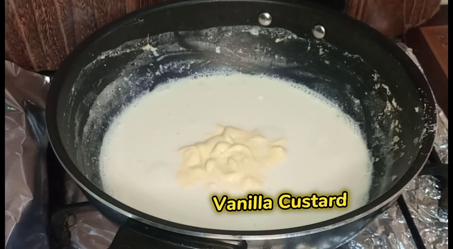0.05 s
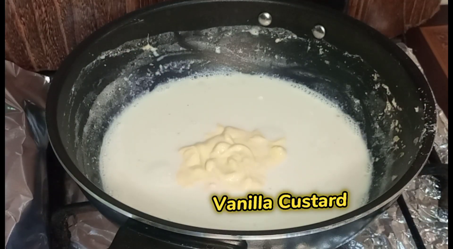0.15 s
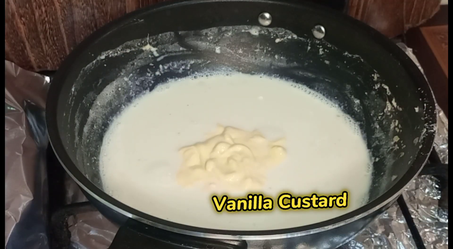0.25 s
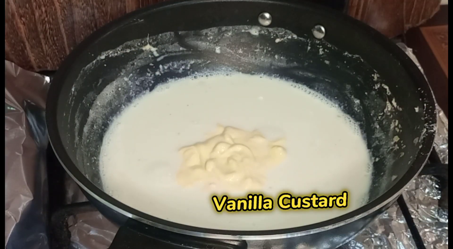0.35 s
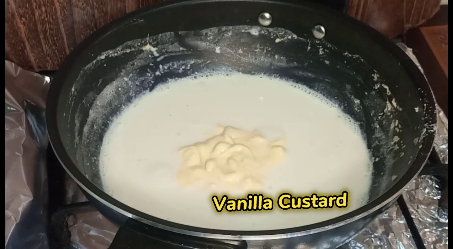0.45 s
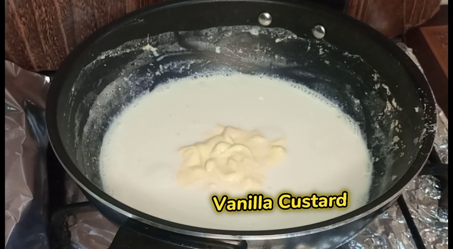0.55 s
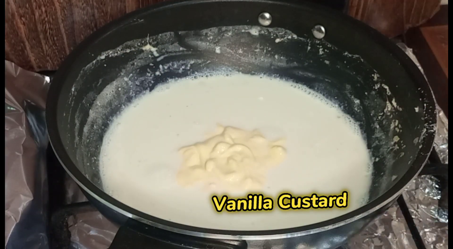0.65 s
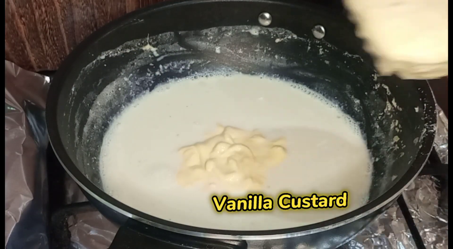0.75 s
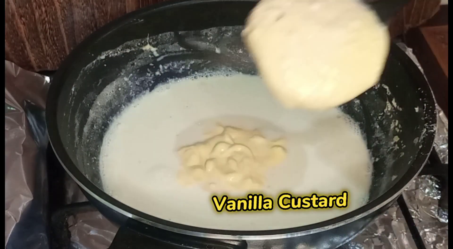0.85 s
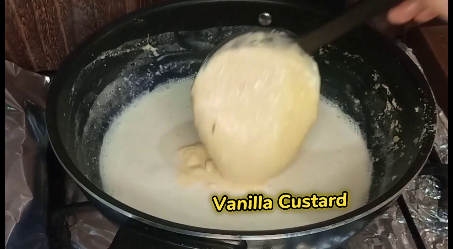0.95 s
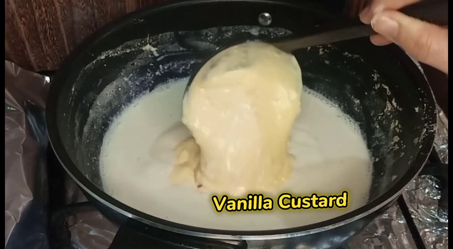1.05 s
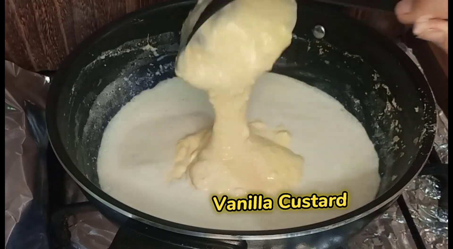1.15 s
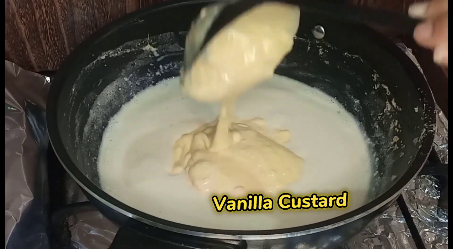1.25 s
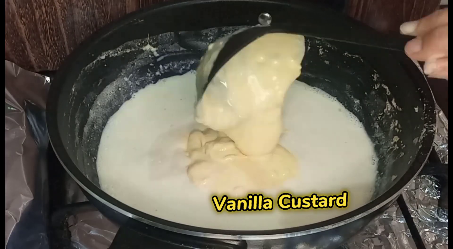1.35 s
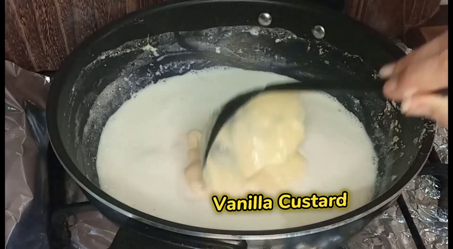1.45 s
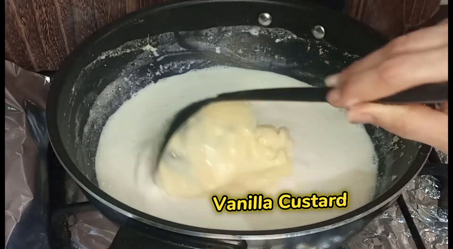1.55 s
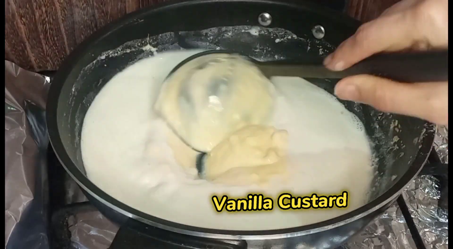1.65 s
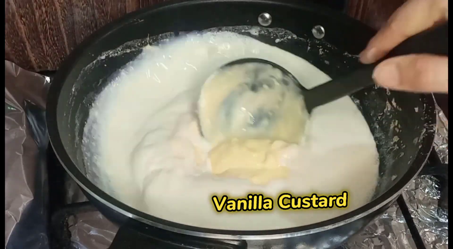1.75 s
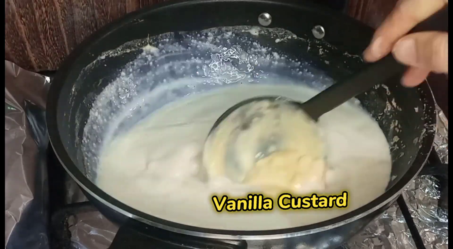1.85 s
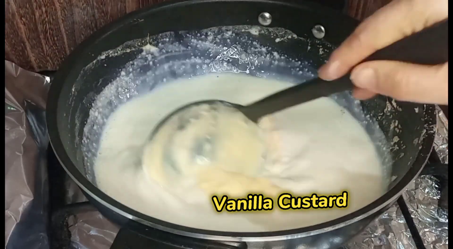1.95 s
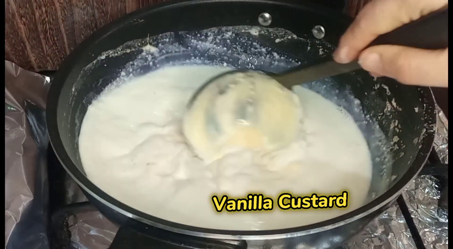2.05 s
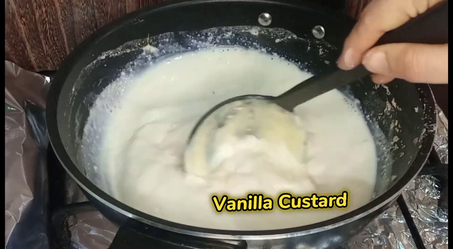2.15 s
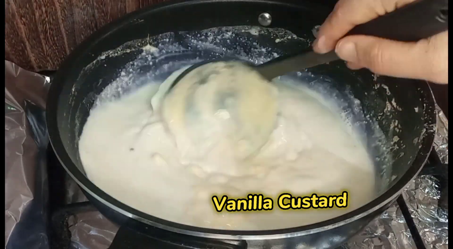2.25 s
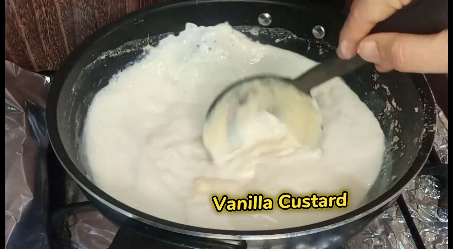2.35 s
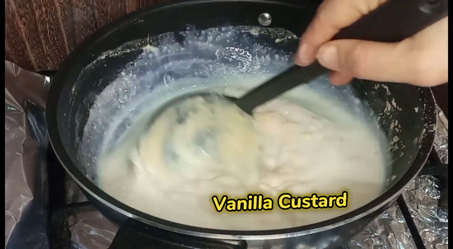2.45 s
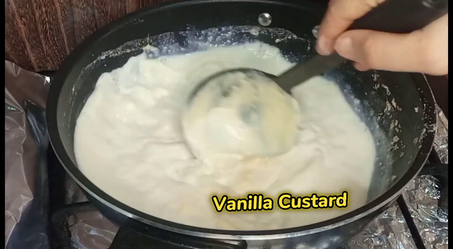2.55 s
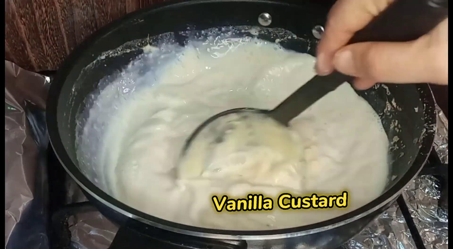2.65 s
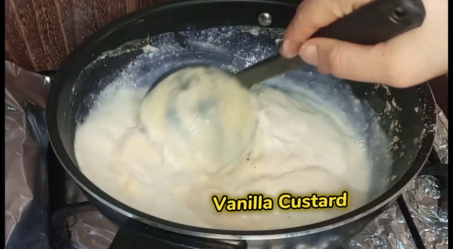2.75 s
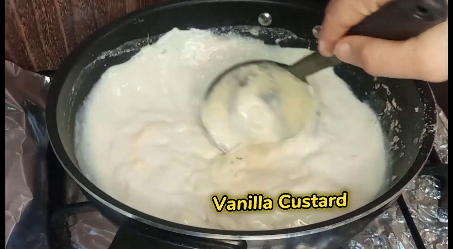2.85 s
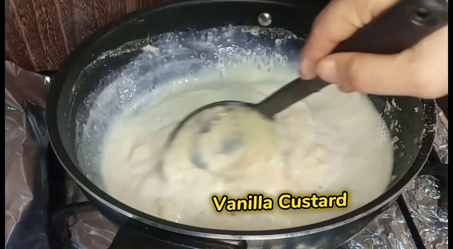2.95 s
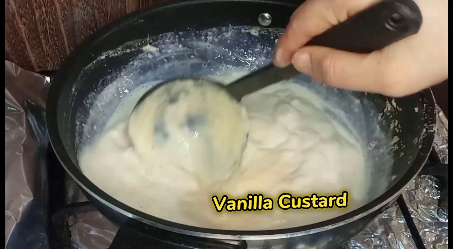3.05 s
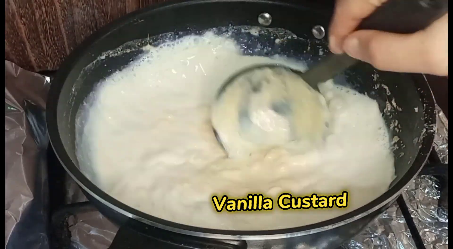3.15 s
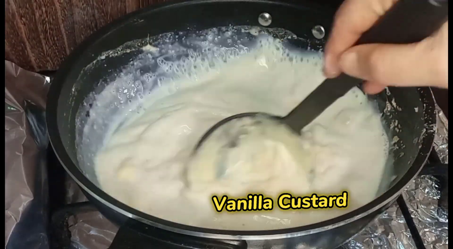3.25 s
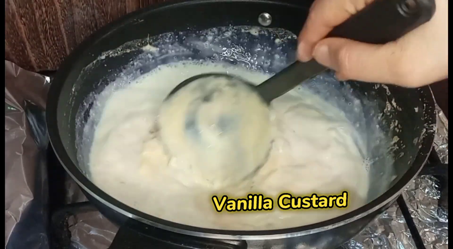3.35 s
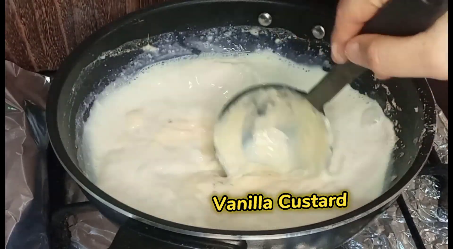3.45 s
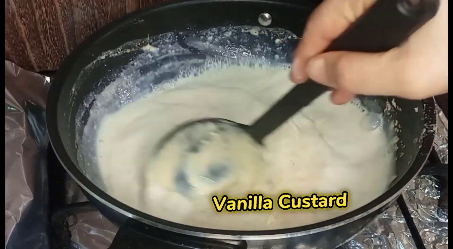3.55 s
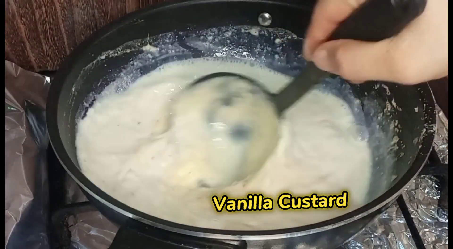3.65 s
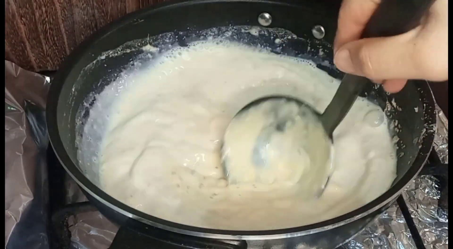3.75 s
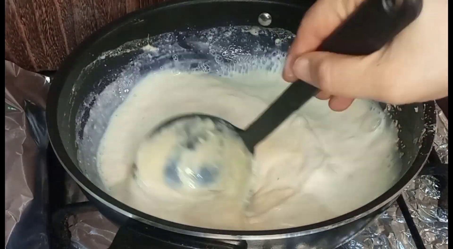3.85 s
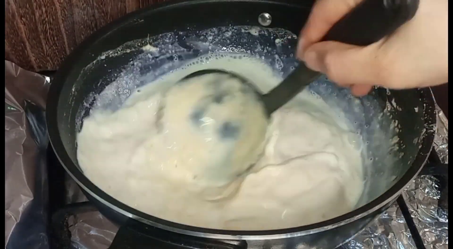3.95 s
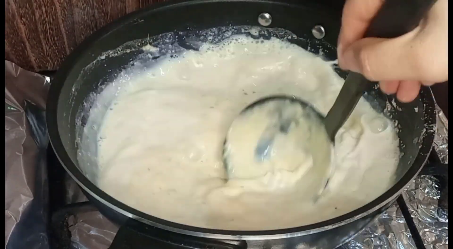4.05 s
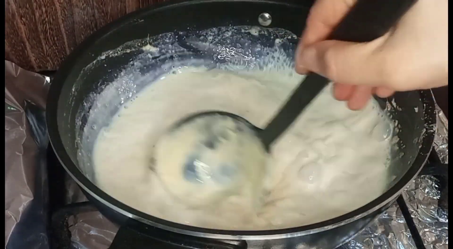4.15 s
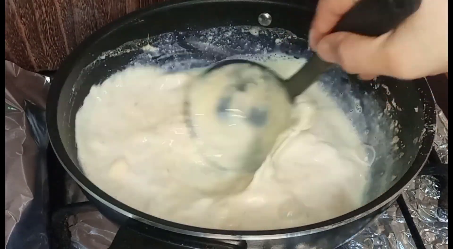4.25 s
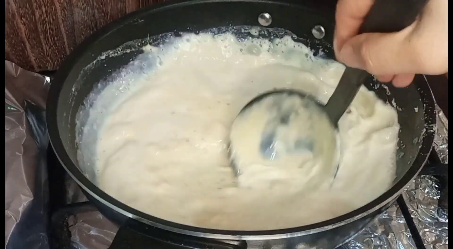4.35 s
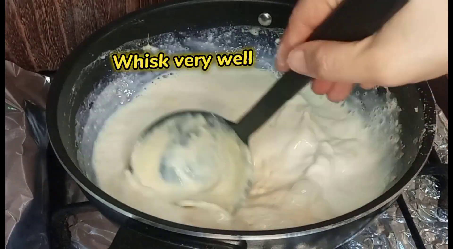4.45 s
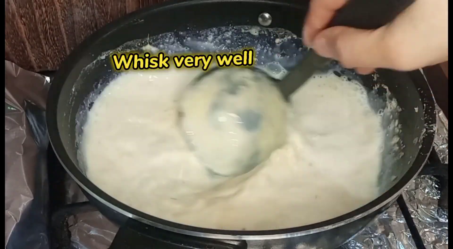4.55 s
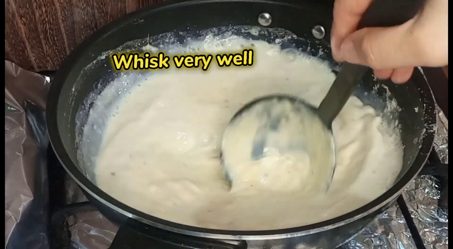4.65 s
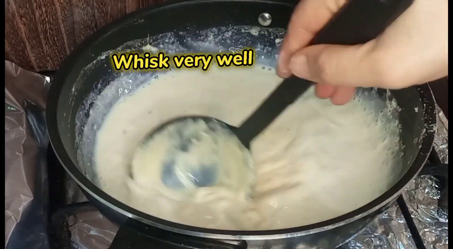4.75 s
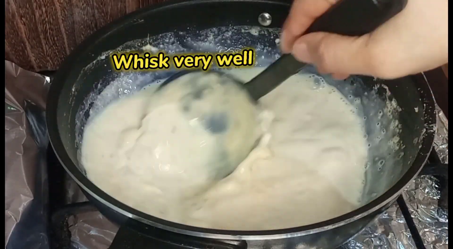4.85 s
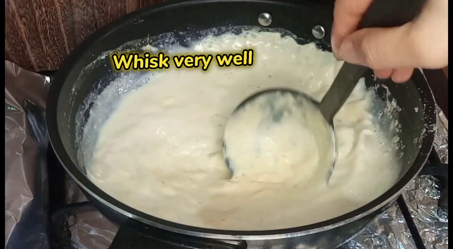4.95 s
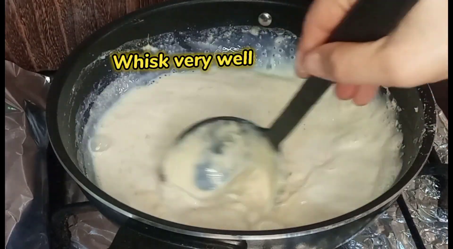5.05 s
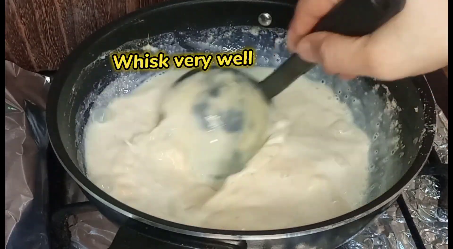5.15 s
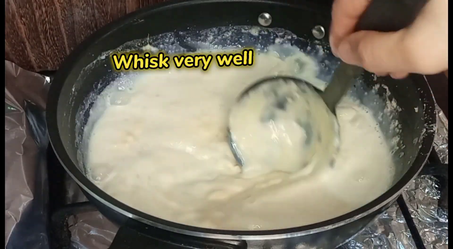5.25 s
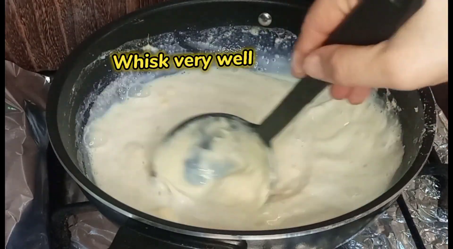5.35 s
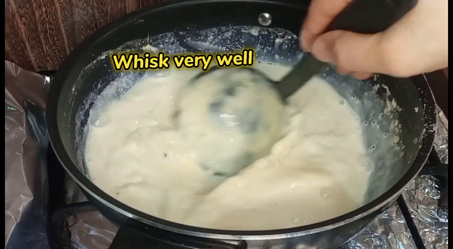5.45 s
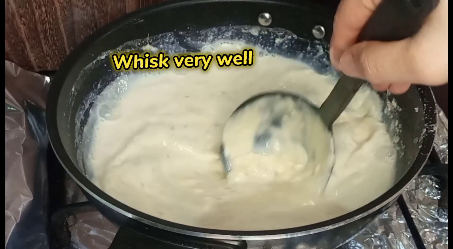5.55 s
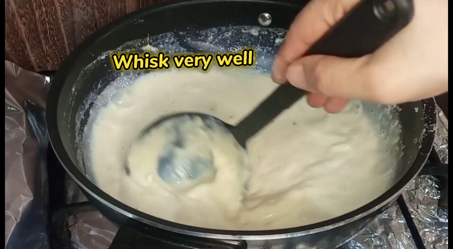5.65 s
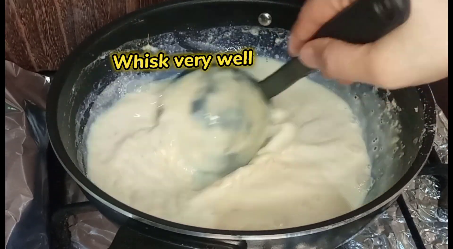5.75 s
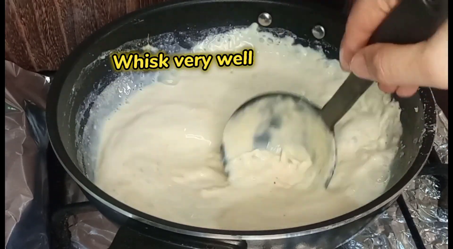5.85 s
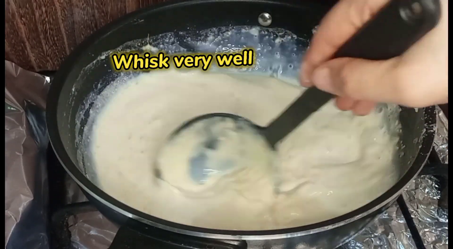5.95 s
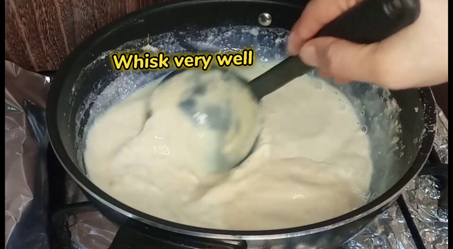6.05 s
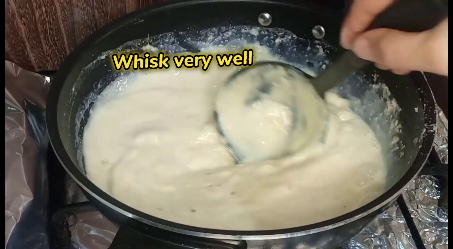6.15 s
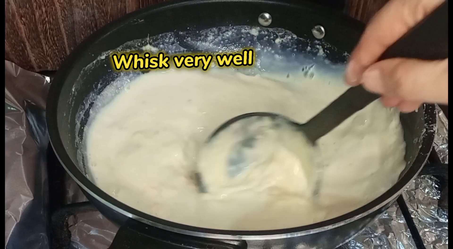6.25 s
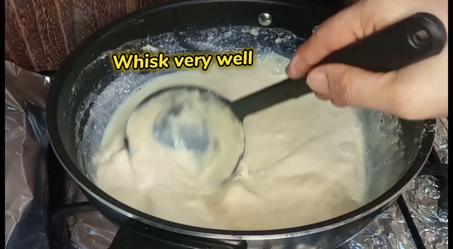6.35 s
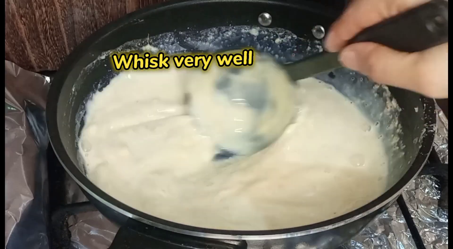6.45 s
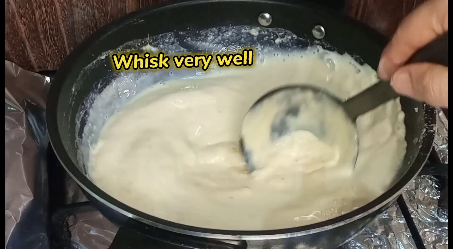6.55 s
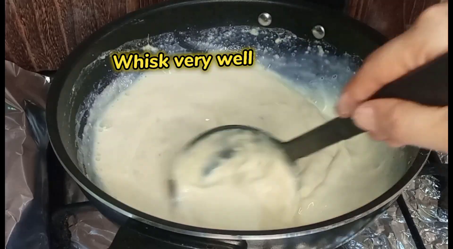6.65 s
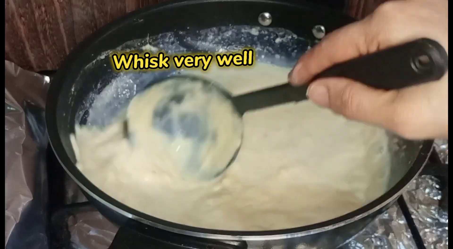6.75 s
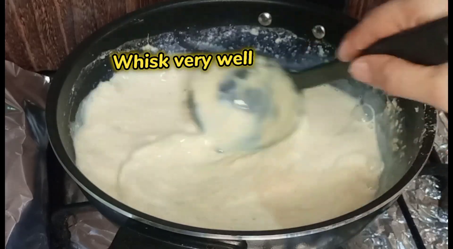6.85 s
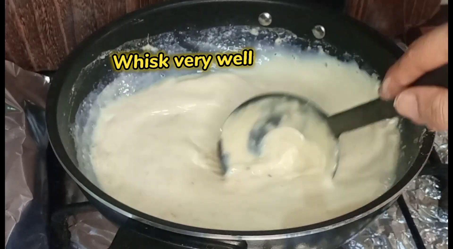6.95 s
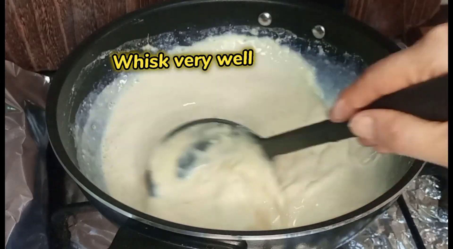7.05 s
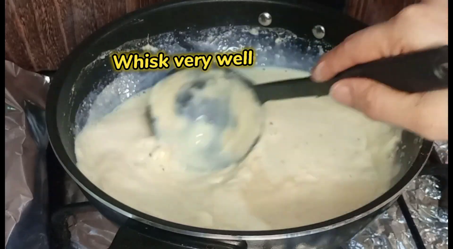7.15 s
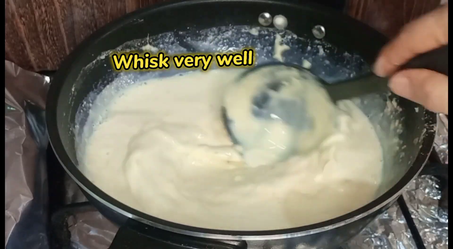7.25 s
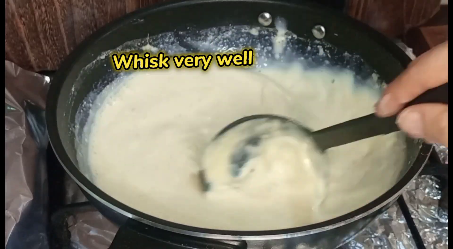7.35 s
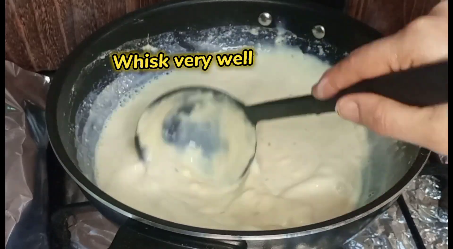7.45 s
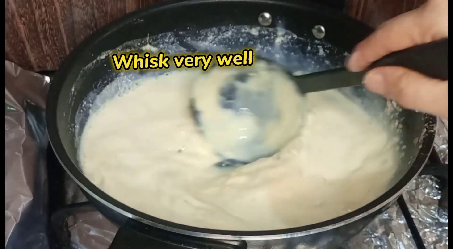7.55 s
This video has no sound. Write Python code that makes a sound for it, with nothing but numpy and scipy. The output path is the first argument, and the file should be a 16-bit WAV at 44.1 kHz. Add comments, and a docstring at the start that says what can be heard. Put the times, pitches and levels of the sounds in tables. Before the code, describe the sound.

A ladle briskly stirs thick custard in a nonstick pan, scraping grittily with dull knocks, sharp ticks and small wet squeaks, in a quiet kitchen.

```python
"""First comes quiet kitchen air with a low murmur; after about a second a ladle starts to stir thick custard
in a coated pan on a gas stove, close to a phone. Each stroke drags the bowl over the pan floor: gritty rubbing
makes the hiss and sets the pan ringing, and now and then one mode sings out. Shoves rock the pan on its trivet
with a low rumble. Knocks are short pushes that ring pan and stove; ticks are tiny rings with a crack. Squeaks
and a swish come from the custard. Behind it all lie the air, the murmur and a faint steady whine."""
import sys
import numpy as np
from scipy import signal
from scipy.fft import rfft, irfft
from scipy.io import wavfile
from scipy.ndimage import uniform_filter1d

SR = 44100
rng = np.random.default_rng(int(sys.argv[2]) if len(sys.argv) > 2 else 0)


def file_out(sig):
    """Save sig as 16-bit WAV at sys.argv[1]."""
    # one column per channel
    cols = np.atleast_2d(sig).T
    # limit, then scale
    lim = np.clip(cols, -1, 1)
    pcm = np.round(lim * 32767).astype(np.int16)
    wavfile.write(sys.argv[1], SR, pcm)


N = 334719  # length in samples

# All table levels are before the small trims made where they are played.
# Strokes of the ladle: peak t/s, rise t/s, fall t/s, then level/dB of hiss, rim ring, wall ring, floor ring
STROKES = [(1.095, 0.072, 0.12, -74, -78, -64.5, -74), (1.628, 0.032, 0.19, -62, -63, -48, -52.5),
           (1.699, 0.096, 0.19, -59, -68.5, -88.5, -60), (2.004, 0.059, 0.44, -51, -54.5, -54.5, -52),
           (2.072, 0.028, 0.078, -50, -41.5, -38, -35), (2.145, 0.027, 0.11, -49, -48, -38, -46),
           (2.314, 0.015, 0.027, -82.5, -52.5, -52, -49.5), (2.411, 0.08, 0.12, -46.5, -46.5, -37.5, -45.5),
           (2.56, 0.31, 0.97, -51.5, -55, -54.5, -57), (2.644, 0.02, 0.15, -47.5, -48, -42.5, -45),
           (2.829, 0.11, 0.25, -47, -50.5, -54, -52.5), (2.928, 0.02, 0.2, -47.5, -51, -43.5, -43.5),
           (3.103, 0.067, 0.18, -48.5, -49, -51, -46.5), (3.241, 0.04, 0.15, -45, -45.5, -38, -42),
           (3.389, 0.065, 0.12, -46, -45, -50, -44), (3.512, 0.077, 0.31, -51, -55, -49, -46.5),
           (3.666, 0.049, 0.13, -54, -50.5, -57, -75.0), (3.815, 0.35, 0.46, -63, -49.5, -74, -54.5),
           (3.883, 0.16, 0.29, -50.5, -52, -51, -54.5), (4.114, 0.12, 0.25, -45, -44, -50.5, -45.5),
           (4.211, 0.078, 0.15, -51.5, -51, -48.5, -48.5), (4.373, 0.11, 0.39, -45, -44.5, -45, -47),
           (4.584, 0.0044, 0.051, -56.5, -53, -47, -61), (4.712, 0.08, 0.37, -49, -47.5, -47.5, -40.5),
           (4.911, 0.028, 0.065, -44.5, -45.5, -44.5, -63), (4.999, 0.017, 0.15, -44.5, -35.5, -30.5, -46),
           (5.132, 0.22, 0.2, -46, -42.5, -47, -45), (5.242, 0.067, 0.11, -49.5, -94, -53.5, -44),
           (5.313, 0.024, 0.27, -44, -46, -46, -51), (5.46, 0.21, 0.26, -49, -45.5, -73, -49.5),
           (5.596, 0.019, 0.47, -45.5, -42.5, -44.5, -48.5), (5.8, 0.034, 0.11, -44, -44.5, -43, -50),
           (5.906, 0.036, 0.13, -42, -43.5, -46.5, -47.5), (6.013, 0.078, 0.16, -48.5, -45.5, -49, -57),
           (6.149, 0.012, 0.4, -52.5, -59, -75, -89.5), (6.27, 0.13, 0.17, -50.5, -49.5, -47, -47),
           (6.357, 0.078, 0.1, -46, -45.5, -51, -59), (6.444, 0.03, 0.33, -45.5, -44.5, -55.5, -49),
           (6.67, 0.15, 0.13, -46.5, -44.5, -44, -47), (6.808, 0.082, 0.24, -44, -44.5, -50.5, -45),
           (7.014, 0.083, 0.28, -43, -45.5, -47.5, -48), (7.192, 0.091, 0.18, -42.5, -43.5, -46, -43),
           (7.363, 0.12, 0.18, -46.5, -45, -46.5, -45), (7.546, 0.14, 0.15, -45, -47.5, -50.5, -48.5)]
STROKE_CURVE = (1.95, 1.67)  # roundness of rise and fall: 1 = straight in dB, 2 = bell
# Per part: (lag behind the listed peak t/s, share of the listed fall time)
HISS_TIMING, RIM_TIMING, WALL_TIMING, FLOOR_TIMING = (0.0028, 0.83), (0.0054, 0.81), (0.0034, 0.63), (0.0095, 0.68)
# Ringing tones (modes) of the pan's floor, wall and rim, and of the ladle: f/Hz, level/dB
FLOOR_MODES = [(393, -6.5), (533, 3.5), (575, 4), (610, -7.5), (660, 1), (720, -1.5), (838, -12)]
WALL_MODES = [(960, 2.2), (1020, 6.3), (1065, 8.8), (1135, 8.1), (1230, 5.6), (1320, 1.1), (1405, 4.3)]
RIM_MODES = [(1600, 1), (1680, 5.5), (1810, 4.5), (1890, -1), (2010, -2.5), (2180, 2), (2280, 3),
             (2450, -3.5)]
LADLE_MODES = [(3330, -9.5), (4170, -2.5), (4650, -6.5), (5800, -5), (6400, -11), (8600, -13)]
# Tone colour of the rubbing hiss and of the wet crackle: f/Hz, level/dB
HISS = [(1410, -25), (2400, -10), (2490, -10), (2850, -6), (3430, -5), (4310, -4.5), (5060, -9),
        (5820, -6.5), (6570, -6.5), (9030, -14), (11000, -25), (14300, -80)]
WET = [(5000, -81), (8500, -1.5), (12100, -14), (13500, -28), (14900, -2.5), (15500, -13), (16000, -6)]
# Crackle level/dB at the hiss level/dB of a firm stroke, and dB gained per dB of hiss
CRACKLE_DB, FIRM_DB, CRACKLE_SLOPE = -64.5, -49, 0.86


def scraping(hiss_db):
    """The ladle bowl drags over the coating: hiss, wet crackle, ladle tones and the pan's modes."""
    rim_db = swells(STROKES, 4, RIM_TIMING, STROKE_CURVE)
    wall_db = swells(STROKES, 5, WALL_TIMING, STROKE_CURVE)
    floor_db = swells(STROKES, 6, FLOOR_TIMING, STROKE_CURVE)
    slip_db = 1.2 * walk(22) + 2.2 * walk(150)  # the grip slips and catches

    hiss, force = 0, grit(0.57) + 0.13 * pops(97, 2.5)
    for hz in 2400 * 2 ** np.arange(0, 2.3, .15):  # each patch of the hiss swishes on its own
        patch = [(hz / 1.11, -40), (hz / 1.05, 0), (hz * 1.05, 0), (hz * 1.11, -40)]
        patch_db = 3.16 * walk(12) - 4.3 * np.abs(walk(40))
        hiss = hiss + undb(patch_db) * colour(force, patch)
    hiss = colour(hiss, HISS)
    running_level = np.sqrt(uniform_filter1d(hiss ** 2, size=4000))
    hiss *= undb(hiss_db + slip_db - 0.83) / running_level  # evened out, then given the strokes' level

    crackle_db = CRACKLE_DB + CRACKLE_SLOPE * (hiss_db - FIRM_DB)  # harder strokes squeeze out more bubbles
    crackle_db = crackle_db + slip_db + 2.1 * walk(4.27) + 0.84 * walk(38)
    wet = unit(colour(grit(4.3) + 0.33 * pops(50, 7.7), WET)) * undb(crackle_db)

    # many weak modes fill the valleys between the strong ones
    body = unit(colour(grit(4.3), [(700, -34), (1100, -4.5), (2000, 12.0), (2800, 0.5)]))
    body *= undb(rim_db + slip_db - 6.0)

    pan = rubbed(FLOOR_MODES, 0.073, floor_db + slip_db / 2 - 2.5 + 0.77 * walk(14), 6.2, 13, 0.018)
    pan += rubbed(WALL_MODES, 0.032, wall_db + slip_db / 2 - .6, 3.0, 18, 0.012)
    pan += rubbed(RIM_MODES, 0.024, rim_db + slip_db / 2 - 0.7, 5.9, 18, 0.025)
    ladle = rubbed(LADLE_MODES, 0.01, hiss_db - 9, 6.0, 20, 0.03)
    return hiss + squeaks(hiss_db) + wet + ladle + pan + body


def squeaks(hiss_db, rate=130, length_s=0.035, level_db=0.1):
    """Air squeezed out of the custard: brief gliding whistles, rate per second, that follow the hiss level."""
    out = np.zeros(N + 4096)  # spare room for the last whistle
    for s, pitch, glide, size in rng.random((int(rate * N / SR), 4)):
        n, i = int(length_s * SR * (0.35 + 1.85 * size ** 2)), int(s * N)
        hz = 1300 * 7.5 ** pitch * (1 + 0.062 * (glide - .4) * np.linspace(0, 1, n))
        whistle = np.hanning(n) * np.sin(2 * np.pi * np.cumsum(hz) / SR)
        out[i:i + n] += undb(level_db - 9.0 * glide - 5.0 * pitch) * whistle
    return out[:N] * undb(hiss_db)


# Ring accents, moments when one mode of the rubbed pan sings out: peak t/s, length t/s, level/dB, f/Hz
RING_ACCENTS = [(4.24, 0.064, -48.5, 538), (5.966, 0.052, -45, 2290), (6.35, 0.048, -41.5, 2220),
                (7.148, 0.04, -44, 667), (7.334, 0.019, -42, 1310), (7.365, 0.02, -48, 2260),
                (7.515, 0.015, -45, 2210)]


def ring_accents(width=0.044):
    """Each accent is a brief swell of rough noise in one narrow mode of the rubbed pan."""
    t, out = np.arange(N) / SR, 0
    for s, length_s, db, hz in RING_ACCENTS:
        peak = [(hz / (1 + 2 * width), -25), (hz, 0), (hz * (1 + 2 * width), -25)]
        band = unit(colour(grit(1.2), peak))
        out = out + band * undb(db - 10 * ((t - s) / length_s) ** 2)
    return out


# Shoves that rock the pan on the trivet: peak t/s, rise t/s, fall t/s,
# low rumble level/dB, upper stove modes level/dB
SHOVES = [(1.401, 0.049, 0.032, -88, -67), (1.637, 0.068, 0.27, -52.5, -84),
          (2.084, 0.015, 0.14, -36, -38.5), (2.15, 0.073, 0.078, -45, -46), (2.312, 0.3, 0.17, -53.5, -68),
          (2.672, 0.15, 0.042, -60.5, -87), (3.919, 0.27, 0.11, -59.5, -92), (4.11, 0.13, 0.081, -61, -62),
          (4.34, 0.23, 0.47, -67, -62), (4.753, 0.058, 0.29, -38.5, -37.5),
          (4.938, 0.197, 0.89, -47.5, -80), (5.16, 0.026, 0.24, -90.0, -46), (6.6, 0.18, 0.56, -66, -88),
          (6.81, 0.041, 0.1, -68, -59.5), (7.179, 0.08, 0.15, -38, -35), (7.378, 0.17, 0.27, -42.5, -56)]
SHOVE_CURVE = (3.1, 1.31)  # roundness of rise and fall, as for the strokes
LOW_TIMING, HIGH_TIMING = (0.00089, 1.06), (-0.00059, 0.92)  # (lag t/s, share of the fall time)
TREMBLE_LOW_DB, TREMBLE_HIGH_DB = -25, -27  # the stove trembles under any stroke, relative to its hiss
# Low and upper ringing tones of the stove top: f/Hz, level/dB
STOVE_LOW = [(55, -3.5), (74, -6), (101, 6), (136, 7), (165, -2.5), (190, -7.5)]
STOVE_HIGH = [(213, -4), (244, -1), (296, -7.5), (338, -9), (402, -2.5), (455, -9.5)]


def rocking(hiss_db):
    """The shoved pan judders on the trivet: stove-top modes over a dense rattle."""
    low_db = swells(SHOVES, 3, LOW_TIMING, SHOVE_CURVE)
    high_db = swells(SHOVES, 4, HIGH_TIMING, SHOVE_CURVE)
    judder_db = 1.8 * walk(45)
    # add the energies of shove and tremble
    low_db = 20 * np.log10(np.hypot(undb(low_db), undb(hiss_db + TREMBLE_LOW_DB))) + judder_db
    high_db = 20 * np.log10(np.hypot(undb(high_db), undb(hiss_db + TREMBLE_HIGH_DB))) + judder_db
    rattle = unit(colour(grit(1.9), [(150, -29.0), (250, 7.5), (450, 0.5), (900, -2), (1500, -34)]))
    stove = rubbed(STOVE_LOW, 0.065, low_db - 0.7, 2.6, 14, 0.018)
    stove += rubbed(STOVE_HIGH, 0.07, high_db + 0.3, 3.3, 12, 0.012)
    return stove + rattle * undb(high_db - 2.3)


# Dull knocks of ladle on pan: t/s, peak level/dB, share of the low modes level/dB
KNOCKS = [(1.628, -32.5, -17), (2.072, -7.5, 1), (2.081, -12, 4), (2.098, -17, -8), (2.119, -18, 0),
          (2.319, -35, -3), (2.624, -18.5, -34), (2.944, -23, -28), (3.223, -31, -23), (3.85, -30.5, 1),
          (4.733, -19, 23), (4.756, -16, 12), (5.01, -13, -34), (5.026, -18.5, -31), (5.046, -19, -21),
          (7.178, -29, 3), (7.326, -25, -14)]


def knocks():
    """Each blow is a short push into all the modes; random shares stand for its place on the pan."""
    low, high = FLOOR_MODES + STOVE_HIGH + STOVE_LOW, WALL_MODES + RIM_MODES
    out, shares = np.zeros(N), rng.standard_normal((len(KNOCKS), len(low + high)))
    push = np.zeros(SR // 4)
    push[:34] = np.hanning(34)  # under a millisecond of contact force
    rings = []
    for hz, db in low + high:
        t60 = 0.027 * (1000 / hz) ** 0.12  # the ladle stays in contact and damps the ring, high modes sooner
        kick = np.gradient(push) * SR / (2 * np.pi * hz)
        rings.append(undb(db) * mode(kick, hz, t60))
    rings = np.array(rings)
    is_low = np.arange(len(rings)) < len(low)
    for (s, db, low_db), share in zip(KNOCKS, shares):
        weights = np.sign(share) * undb(2.3 * np.abs(share)) * np.where(is_low, undb(low_db), 1)
        ring = weights @ rings
        i = int(s * SR)
        out[i:i + len(ring)] += (undb(db - 8) * ring / np.max(np.abs(ring)))[:N - i]
    return out


# Sharp ticks and wet pops: t/s, level/dB, f/Hz, broad crack against the ring level/dB
TICKS = [(1.0277, -35.5, 7100, 18), (1.383, -56.5, 1990, 23.5), (1.961, -40, 2190, 10.5),
         (2.146, -29, 4400, -6), (2.3484, -34, 5810, -1), (2.3635, -29.5, 6540, -1),
         (2.597, -25.5, 6800, 4), (2.629, -21, 4370, 14), (2.638, -24, 3280, -4), (2.752, -23.5, 4100, -7),
         (2.779, -38, 7450, 20), (2.881, -20.5, 4130, 6), (2.884, -16, 4600, 5), (2.8853, -21, 2130, 4),
         (3.3707, -27, 6300, 0), (3.6537, -17, 3680, -6), (3.7779, -33, 2300, 13),
         (3.7986, -35, 5200, 11.5), (3.849, -30, 2070, -3), (4.0425, -46, 5000, 12), (4.0973, -13, 2510, 7),
         (4.359, -22.5, 3410, 13.5), (4.3696, -18, 2880, 7), (4.373, -16.5, 1860, 8.5),
         (4.5932, -31, 2290, -14), (4.6796, -38.5, 5000, 18), (4.8991, -30, 5950, 5),
         (4.995, -9.5, 2170, -2), (5.05, -27.5, 2320, 13.5), (5.133, -9.5, 2450, -22),
         (5.1417, -18.5, 2770, -5), (5.2164, -25, 6200, -2), (5.2594, -40, 4620, 17),
         (5.344, -21.5, 8630, 5), (5.315, -23.5, 5440, 8), (5.596, -16.5, 1850, 4),
         (5.659, -24, 2050, 10.5), (5.8002, -27, 3430, -1), (5.9003, -23, 2260, 14.5),
         (6.1424, -25.5, 3300, -10), (6.4528, -23.5, 3380, -5), (6.56, -30, 2300, 12),
         (7.37, -28.5, 2280, 9)]
# Tone colour of the crack: f/Hz, level/dB
CRACK = [(1000, -5), (2500, 1), (5000, 0.5), (9000, 5.5), (13300, -6.5), (15000, 6), (16000, 7)]


def ticks():
    """A short ring that rises from the tick's pitch, with a broad crack and a gritty tail."""
    out, t = np.zeros(N), np.arange(SR // 10) / SR
    noise = rng.standard_normal((len(TICKS), len(t)))
    for (s, db, hz, crack_db), hiss in zip(TICKS, noise):
        ring = np.sin(2 * np.pi * hz * t * (1 + 0.86 * t))
        ring *= (1 - np.exp(-t / 0.00029)) * undb(-60 * t / 0.021)
        grains = np.abs(np.repeat(hiss[::40], 40)[:len(t)]) ** 0.64  # uneven steps roughen the tail
        fade = np.exp(-t / 0.00062) + 0.14 * np.exp(-t / 0.023) * grains
        crack = unit(colour(hiss, CRACK)) * (1 - np.exp(-t / 0.00024)) * 1.73 * fade
        i = int(s * SR)
        out[i:i + len(t)] += (undb(db - 8.5) * (ring + undb(crack_db - 12.0) * crack))[:N - i]
    return out


# A thin swish as custard slides off the ladle: t/s, level/dB, f/Hz
SWISH = [(1.68, -76, 4180), (1.78, -65, 4630), (1.9, -71, 4900), (1.96, -65, 5060), (2.0, -120, 5150)]


def swish():
    """A narrow band of sliding noise that rises in pitch."""
    db, hz = curves(SWISH)
    band = unit(colour(grit(1.4), [(1, -4), (150, 7), (450, -13)]))
    carrier = np.sin(2 * np.pi * np.cumsum(hz) / SR)  # lifts the low noise up to the swish's pitch
    return np.sqrt(2) * band * undb(db) * carrier


# Tone colour of the kitchen air: f/Hz, level/dB
KITCHEN = [(18, -43), (30, -3), (98, -2), (259, -11), (287, -2.5), (319, -8), (461, -12.5), (937, -14.5),
           (3770, -18.5), (4190, -16), (10800, -28), (14800, -25.5), (16000, -6.5)]
KITCHEN_DB = -67.5  # mean level of the air
WHINE_HZ, WHINE_DB = 2016, -83.5  # a faint steady appliance tone


def kitchen():
    """Quiet kitchen air and microphone hiss, a restless low murmur and a faint whine."""
    t = np.arange(N) / SR
    air = unit(colour(rng.standard_normal(N), KITCHEN)) * undb(KITCHEN_DB + .7 * walk(3))
    murmur = unit(colour(rng.standard_normal(N), [(30, -29), (80, -2.0), (300, -11.0), (900, -15.0)]))
    # the murmur swells briefly, then settles early on
    murmur *= undb(np.interp(t, [0, .3, .75], [-76, -72, -82]) + 2.5 * walk(10))
    whine = np.sqrt(2) * undb(WHINE_DB + 0.65 * walk(7.3)) * np.sin(2 * np.pi * WHINE_HZ * t)
    return air + murmur + whine


def room(x, t60=0.21, wet_db=-17):
    """Small hard kitchen: a decaying noise tail behind the direct sound."""
    t = np.arange(SR // 3) / SR
    tail = rng.standard_normal(len(t)) * undb(-60 * t / t60) * (t > .004)
    return x + undb(wet_db) * signal.fftconvolve(x, tail / np.sqrt(np.sum(tail ** 2)))[:N]


def rubbed(modes, t60, force_db, spot_db, rate, waver):
    """Modes fed by friction; the moving contact deals the force out among them and its load bends their pitch."""
    shares = np.array([undb(db + spot_db * walk(rate)) for _, db in modes])
    shares *= undb(force_db + 1.5 * walk(50)) / np.sqrt(np.sum(shares ** 2, axis=0))
    r = np.exp(-np.log(1000) / (t60 * SR))
    gain = np.sqrt(2 * (1 - r * r) ** 3 / (1 + r * r))  # keeps the level the same for any decay
    out = 0
    for (hz, _), share in zip(modes, shares):
        turn = np.exp(2j * np.pi * np.cumsum(hz * (1 + waver * walk(rate))) / SR)
        push = grit(2.36) * share / turn  # shifted down so that the mode sits at 0 Hz
        # a double pole keeps the valleys between modes dark
        ring = signal.lfilter([gain], [1, -2 * r, r * r], push)
        out = out + (ring * turn).imag
    return out


def mode(x, hz, t60):
    """One decaying resonance; an impulse of 1 rings with amplitude near 1."""
    r, w = np.exp(-np.log(1000) / (t60 * SR)), 2 * np.pi * hz / SR
    return signal.lfilter([0, np.sin(w)], [1, -2 * r * np.cos(w), r * r], x)


def grit(spread_db):
    """Friction force: dense grains of very unequal size, scaled to rms 1."""
    size_db = spread_db * np.minimum(rng.exponential(size=N), 7)
    return unit(rng.standard_normal(N) * undb(size_db))


def pops(rate, spread_db):
    """Tiny bubbles burst at random, rate per second: lone clicks with a very short tail."""
    burst = (rng.random(N) < rate / SR) * undb(spread_db * rng.exponential(size=N))
    tail = np.exp(-np.arange(SR // 100) / SR / 0.0018)
    return unit(signal.fftconvolve(burst, tail)[:N] * rng.standard_normal(N))


def swells(table, column, timing, curve):
    """Level in dB of overlapping swells, each 20 dB down one rise before and one (scaled) fall after its peak."""
    peak, rise, fall = np.transpose(table)[:3]
    t = np.arange(0, N / SR + .002, .001)  # worked out every millisecond
    late = t[:, None] - peak - timing[0]
    distance = np.abs(late / np.where(late < 0, rise, fall * timing[1]))
    shape_db = -20 * distance ** np.where(late < 0, *curve)
    power = np.sum(undb(np.transpose(table)[column] + shape_db) ** 2, axis=1)
    return np.interp(np.arange(N) / SR, t, 10 * np.log10(power + 1e-12))


def walk(rate):
    """Random levels held 1 / rate s and smoothed twice; spread near 1."""
    k = int(SR / rate)
    steps = np.repeat(rng.standard_normal(N // k + 1), k)
    return 1.183 * uniform_filter1d(uniform_filter1d(steps, k), k)[:N]


def curves(table):
    """Columns of a time table at every sample; the first, a level, is at -120 dB before the start."""
    s, db, *rest = np.transpose(table)
    t = np.arange(N) / SR
    return [np.interp(t, s, db, left=-120)] + [np.interp(t, s, c) for c in rest]


def colour(x, points):
    """Sound shaped by (f/Hz, level/dB) points, joined on a log pitch scale and cut by 90 dB outside them."""
    hz, db = np.transpose(points)
    f = np.fft.rfftfreq(len(x), 1 / SR) + 1  # +1 avoids log of zero
    gain = undb(np.interp(np.log(f), np.log(hz), db, left=-90, right=-90))
    return irfft(rfft(x) * gain, len(x))


def undb(db):
    """Gain of a level in dB."""
    return 10 ** (np.asarray(db) / 20)


def unit(x):
    """Scaled to rms 1."""
    return x / np.sqrt(np.mean(x ** 2))


def scene():
    """Ladle, custard and pan in the room, over the kitchen air."""
    hiss_db = swells(STROKES, 3, HISS_TIMING, STROKE_CURVE)
    stirring = scraping(hiss_db) + swish() + rocking(hiss_db) + ring_accents() + knocks() + ticks()
    return (room(stirring) + kitchen())[None]


def record(dry):
    """The deepest bass below 42 Hz is rolled off, and the phone cuts the top above 15750 Hz."""
    bass_cut = signal.butter(3, 42, "high", fs=SR, output="sos")
    top_cut = signal.ellip(10, .2, 60, 15750, fs=SR, output="sos")
    return signal.sosfilt(top_cut, signal.sosfilt(bass_cut, dry))


dry = scene()
out = record(dry)
file_out(out)
```